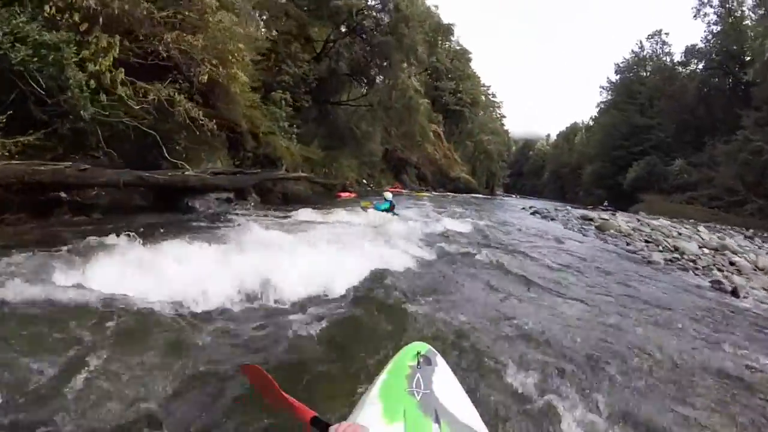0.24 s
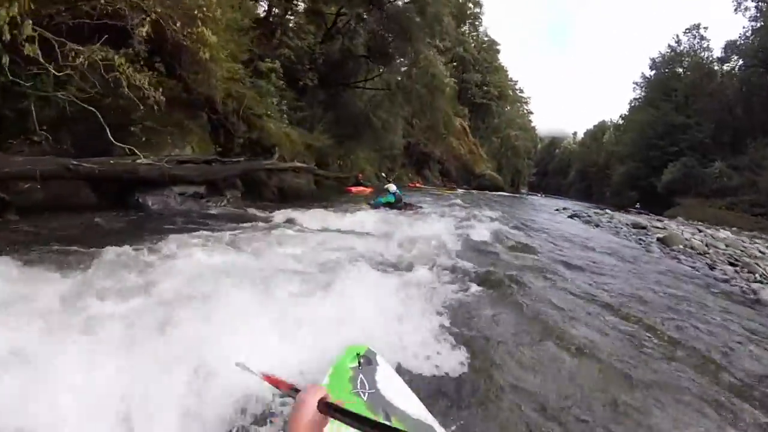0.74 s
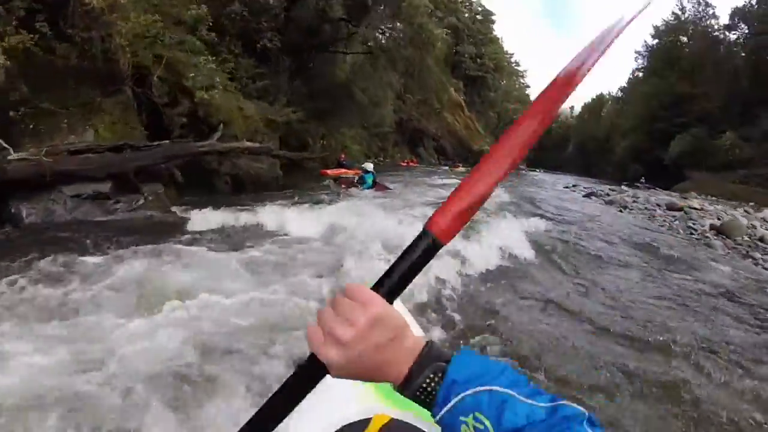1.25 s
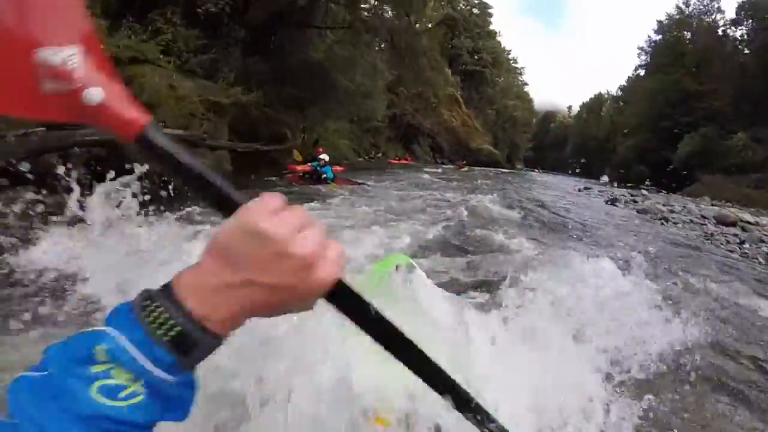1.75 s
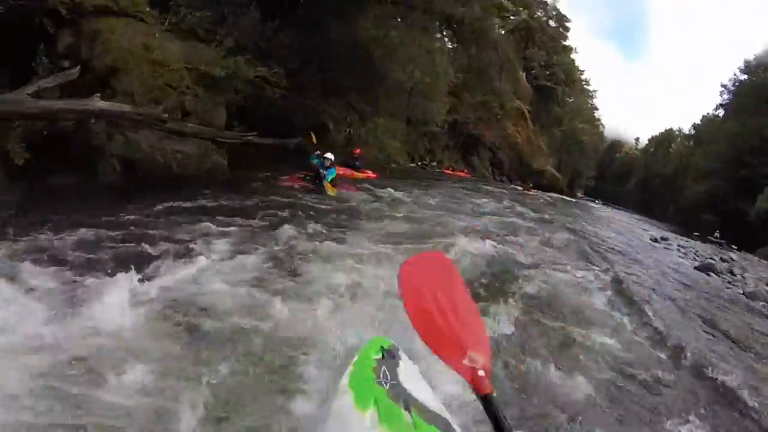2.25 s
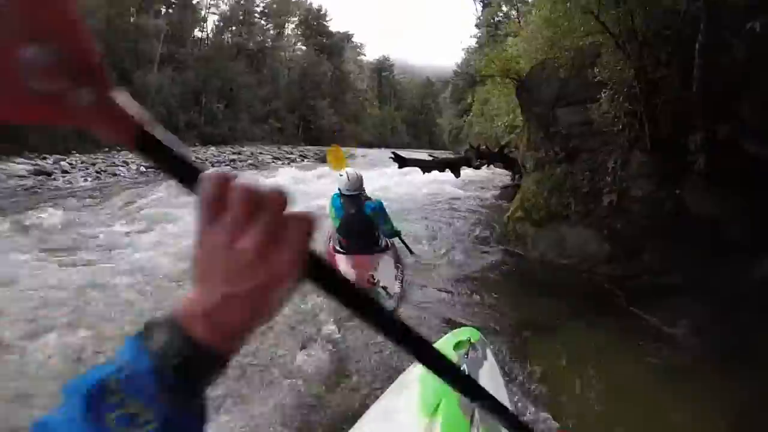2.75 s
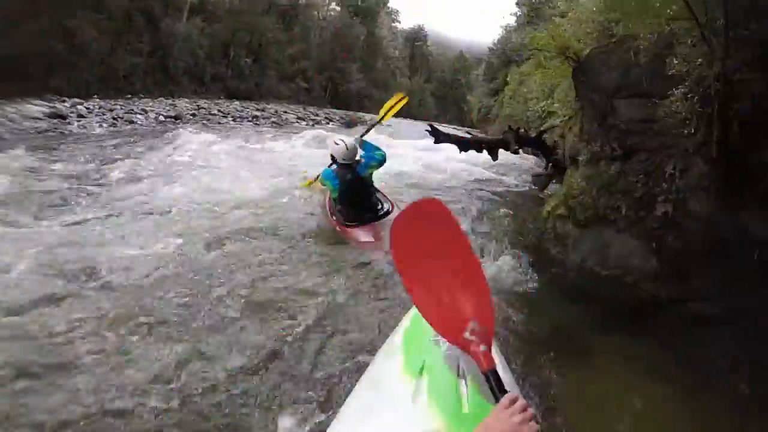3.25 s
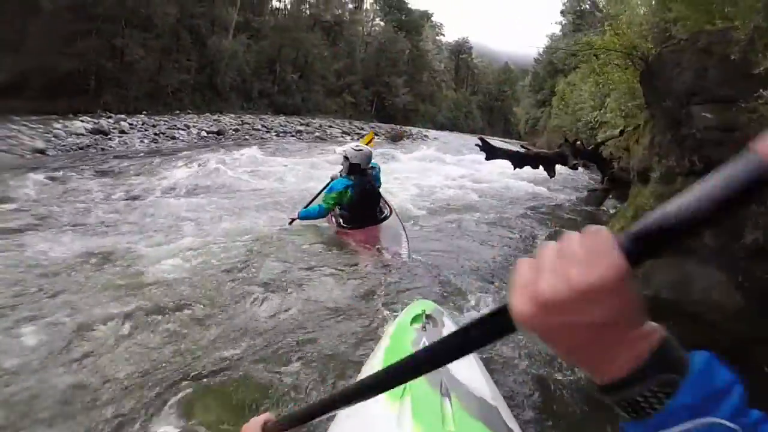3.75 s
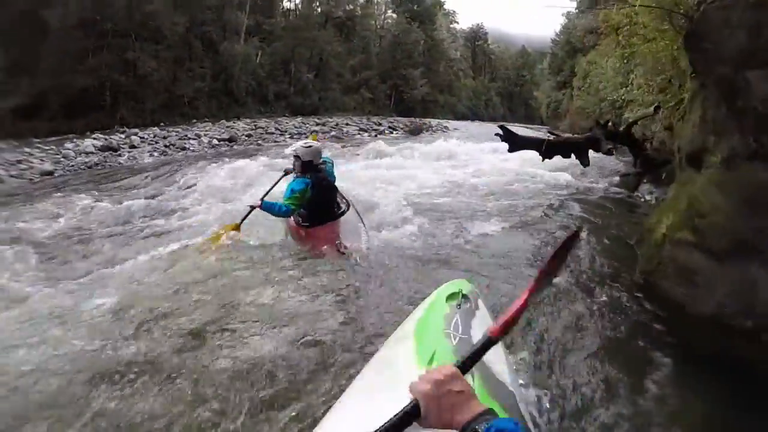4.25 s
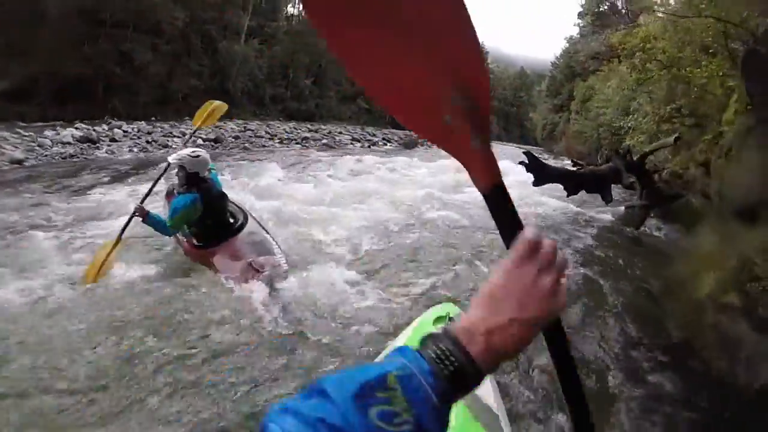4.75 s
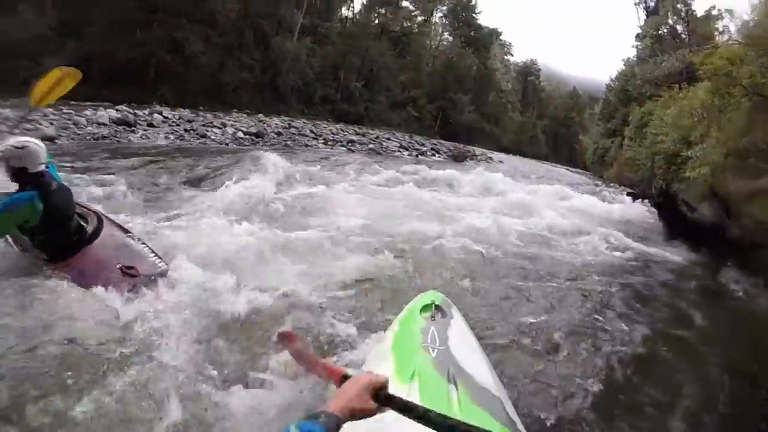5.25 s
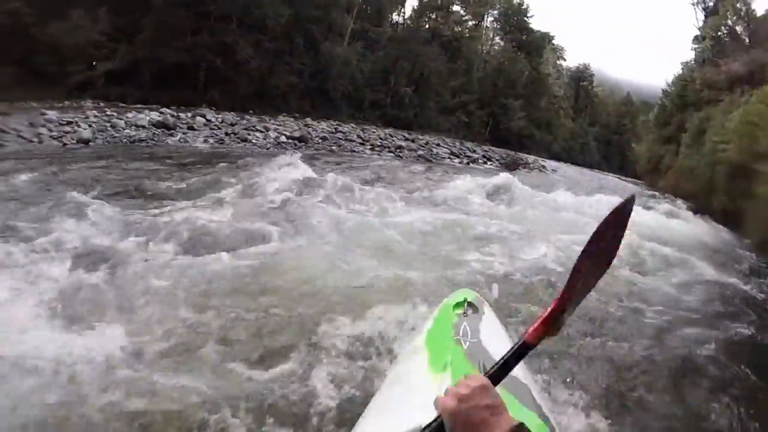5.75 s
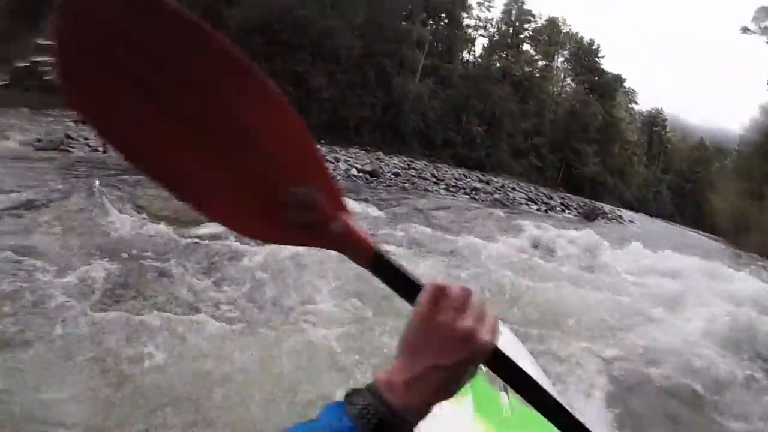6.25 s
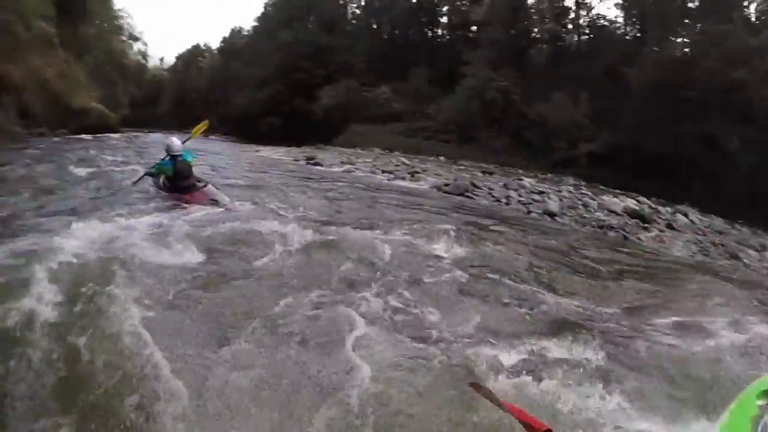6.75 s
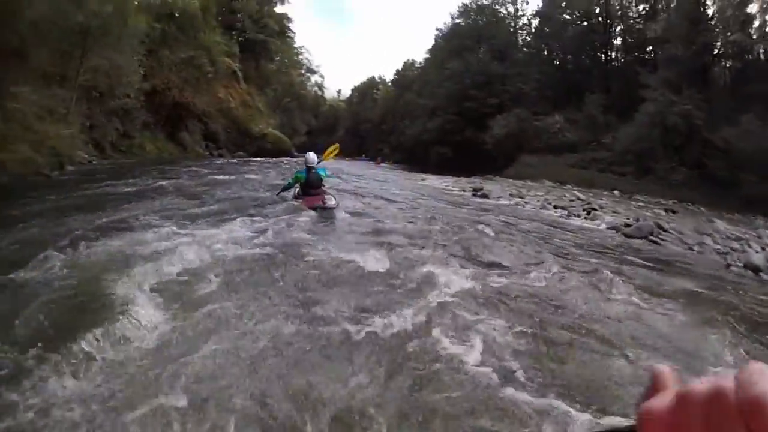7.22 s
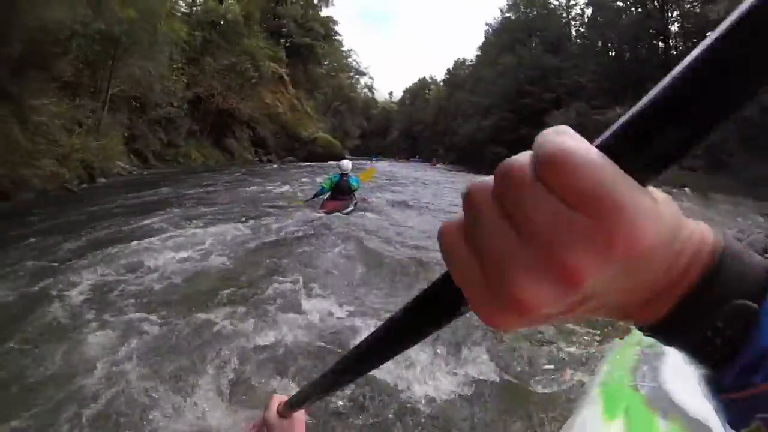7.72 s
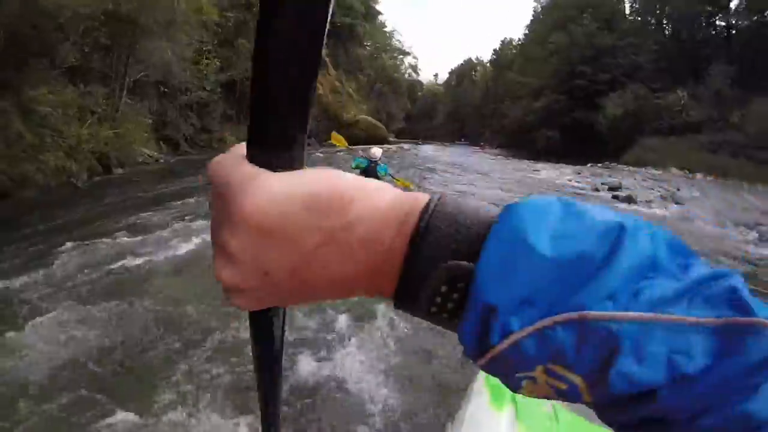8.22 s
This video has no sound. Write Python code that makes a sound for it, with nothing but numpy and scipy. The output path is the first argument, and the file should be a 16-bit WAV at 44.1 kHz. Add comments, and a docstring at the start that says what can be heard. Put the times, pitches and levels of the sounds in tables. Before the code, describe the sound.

A kayak runs a rapid, heard in mono by a microphone in a waterproof case on the paddler. Dense foamy roar swells through a breaking wave, with splashes, hollow hull booms and low air buffeting. Around 2.6 seconds it abruptly quietens; drops, plops and one paddle knock stand out. Stroke surges follow and the roar gradually returns.

```python
"""Foam roars as a kayak runs a whitewater rapid, heard in mono through a waterproof case worn by the paddler.
Foam, gurgle and spray are noise with ringing bubbles, shaped by the resonances of the case walls.
Splashes, drops, bubble plops and a paddle knock stand out; waves boom in the hull and air buffets the case.
The boat first punches through a breaking wave; at 2.6 s the water abruptly becomes quieter."""
import sys
import numpy as np
from scipy import signal
from scipy.fft import rfft, irfft, next_fast_len
from scipy.io import wavfile

SR = 44100
rng = np.random.default_rng(int(sys.argv[2]) if len(sys.argv) > 2 else 0)


def master(y):
    """Save y as 16-bit WAV."""
    cut = np.clip(np.atleast_2d(y).T, -1, 1)
    pcm = np.round(cut * 32767)  # scale
    wavfile.write(sys.argv[1], SR, pcm.astype(np.int16))


N = 373968
TIME = np.arange(N) / SR

# foam level in ordinary running water [dB]
CALM_DB = -41
# how hard the river churns, as its foam level before surges: (time [s], level [dB])
CHURN = [(0.0, -40), (0.2, -39), (0.45, -37), (0.75, -35.5), (2.57, -36.5), (2.605, -45.5), (3.25, -45.5),
         (3.87, -45.5), (4.22, -42.5), (4.62, -45.2), (5.27, -41), (5.8, -42.5), (6.23, -46), (6.62, -43),
         (6.9, -40.5), (7.25, -39.5), (7.7, -41.5), (8.48, -38)]


def churn():
    """Common excitation: one turbulence level, in dB above calm water, drives every river layer."""
    return in_time(CHURN)[0] - CALM_DB


# white water from a paddle stroke or a wave:
# (crest time [s], width at half height [s], added spray [dB], added foam [dB], added gurgle [dB])
SURGES = [(0.66, 0.65, 2.5, 1, 1.5), (1.02, 0.47, 1, 0.6, 3.5), (1.56, 0.16, 2.5, 2, 4),
          (1.904, 0.29, 4.5, .5, 3.5), (2.26, 0.29, 4, 0, 2), (3.035, 0.052, 4.5, 1.5, -0.5),
          (3.2, 0.18, 3.5, 1, 2), (3.53, 0.39, 2.5, 1, 2.5), (3.99, 0.084, 4.5, 1, 2),
          (4.28, 0.19, -1, 0, 2), (4.865, 0.19, 3, 0.8, 0), (5.133, 0.1, 0, 0, 2.5),
          (5.4, 0.17, 1.5, .5, -0.5), (5.798, 0.31, 4.5, 2, 1.5), (6.096, 0.14, 3.5, 1, 3.5),
          (6.385, 0.26, 5.5, 2, 0.5), (6.747, 0.13, 5, 3, 0.5), (7.358, 0.16, 0.5, 0.5, 1),
          (7.668, 0.13, 4.5, 1.3, -1), (7.84, 0.13, 4, 2.5, 2), (8.382, .25, -0.5, -0.1, 1.5)]


def surges():
    """Superposition: overlapping surges sum in decibels, separately for spray, foam and gurgle."""
    return sum(np.outer(more_db, hump(s, width)) for s, width, *more_db in SURGES)


# foam spectrum, before normalization: (frequency [Hz], relative level per Hz [dB])
FOAM_SPECTRUM = [(900, -46.5), (1150, -18.5), (1310, 0.5), (1700, 1.5), (1900, -3), (2550, -1.5),
                 (3000, -9.5), (3600, -9.5), (4500, -43)]
# small over large bubbles, an index scaled by each layer; fresh white water is coarse, the water behind it fine:
# (time [s], foam fineness [dB], fizz fineness [dB])
FINENESS = [(0.0, -1.5, -4), (0.5, -2, -3), (0.9, -3.5, -0.5), (1.3, 0, 2.5), (1.55, -0.5, -3.5),
            (2.5, 1, 3.5), (2.7, -2, -6.5), (2.98, -1, 6.5), (3.3, -0.5, -1), (4.85, -1, 0.5),
            (5.4, -1.5, -2.5), (5.9, -1.5, -3), (6.55, -1, -1.5), (6.77, 1, 1.5), (7.22, 0, 5),
            (7.55, 0.5, 0), (8.15, 0, -1), (8.48, 0.5, 3)]
SURGE_FINE_SHARE = 0.1   # foam fineness gained per dB of added spray


def foam(tumble, surge_db):
    """Bubble resonance: dense small bubbles, born in clumps as crests tumble, ring higher when smaller."""
    births_per_s = 2400 * from_db(1.5 * tumble)
    cloud = bubbles(births_per_s, 1220, 3460, cycles=9.5, spread_db=2.5, clump_s=.012, scatter=.2)
    roar = through_case(froth(cloud, grain_db=-11), FOAM_SPECTRUM)
    fine_db = in_time(FINENESS)[0] + SURGE_FINE_SHARE * surge_db
    # fineness tilts the balance from the low band to the high band
    roar = lift(roar, 1400, 470, -.6 * fine_db)
    roar = lift(roar, 2600, 1600, 1.4 * fine_db)
    return rms_one(roar * from_db(0.52 * drift(26)))


# level in calm water [dB], and dB gained per dB of churn
GURGLE_DB, GURGLE_FOLLOWS = -54.5, 0.68
# gurgle spectrum, before normalization: (frequency [Hz], relative level per Hz [dB])
GURGLE_SPECTRUM = [(40, -32), (75, -0.5), (140, -3.5), (310, 0), (420, -3), (620, -3.5), (900, -6.5),
                   (1200, -3.5), (2000, -17.5)]


def gurgle():
    """Low bubble resonance: big air pockets folded under the waves ring at low pitches."""
    pockets = bubbles(450, 153.0, 1150, cycles=15.7, spread_db=2.0, clump_s=.03, scatter=.4)
    murmur = through_case(froth(pockets, grain_db=-14.5), GURGLE_SPECTRUM)
    return rms_one(murmur * from_db(0.9 * drift(2.0)))


# level in calm water before surges and run-out [dB], and dB gained per dB of churn
SPRAY_DB, SPRAY_FOLLOWS = -47, 1.14
MIST_FOLLOWS = 0.15   # dB of top-treble lift per dB of churn
# past the last white water the spray thins out: start [s], fade [s], loss [dB]
RUNOUT_S, RUNOUT_FADE_S, RUNOUT_LOSS_DB = 6.9, 0.6, 1.5
# spray spectrum, before normalization: (frequency [Hz], relative level per Hz [dB])
SPRAY_SPECTRUM = [(2600, -22), (3300, -16), (4100, -2), (5700, -1), (6900, -8.5), (7350, -15),
                  (8700, -13.5), (9700, -16), (10500, -21), (11500, -20), (13200, -22), (15000, -29)]


def spray(tumble, spray_db, churn_db):
    """Grain density: fizz and droplets merge in heavy spray and tick one by one in light spray."""
    density = from_db(.5 * (spray_db - np.mean(spray_db)))
    fizz = bubbles(5000 * density, 3560, 14400, cycles=19.5, spread_db=5.5, clump_s=.025, scatter=.14)
    drops_per_s = 800 * density * from_db(4.0 * drift(30))
    # differencing each click brightens it
    ticks = rms_one(np.diff(patter(drops_per_s, spread_db=11.0), prepend=0))
    # the root undoes the power gained from denser grains
    grains = (fizz + from_db(-6) * ticks) / np.sqrt(density)
    hiss = through_case(froth(grains, grain_db=-7.0), SPRAY_SPECTRUM)
    fine_db = in_time(FINENESS)[1]
    # finer bubbles ring higher
    hiss = lift(hiss, 4730, 1230, -.7 * fine_db)
    hiss = lift(hiss, 5880, 600, 0.83 * fine_db)
    # wilder water throws more mist
    hiss = lift(hiss, 11800, 7000, MIST_FOLLOWS * churn_db)
    return rms_one(hiss * from_db(0.42 * tumble))


# splashes thrown up by paddle and bow:
# (onset time [s], level before filtering and layer gains [dB], twice the rise time [s])
SPLASHES = [(1.504, -42.5, 0.044), (1.863, -36.5, .05), (3.17, -47, .02), (3.275, -47, 0.023),
            (3.647, -47, .02), (3.938, -44, 0.025), (4.773, -48, .05), (5.793, -46, .03),
            (6.758, -41, 0.023), (7.262, -43, 0.018), (7.372, -39.5, 0.019), (7.648, -42, 0.026),
            (8.18, -47, 0.021)]


def splashes():
    """Breakup and entrainment: a water sheet falls back as droplets, which drive in small bubbles."""
    sheets = sum(swell(*row) for row in SPLASHES)
    droplets = sheets * rms_one(patter(6500, spread_db=3.0))
    plunge = lift(through_case(droplets, FOAM_SPECTRUM), 3100, 900, db=8.0)
    return from_db(-5) * through_case(droplets, SPRAY_SPECTRUM) + from_db(-6.5) * plunge


# single drops landing close by: (time [s], level before filtering and layer gain [dB])
DROPS = [(3.185, -34), (3.2789, -37.5), (3.543, -40), (3.902, -38.5), (3.9469, -41), (4.9277, -40),
         (5.0324, -41), (5.1177, -39), (5.3951, -38), (5.7099, -39), (5.7967, -45), (5.874, -42),
         (6.5535, -36), (6.8184, -37), (7.1566, -40), (7.2763, -39), (7.385, -41), (7.5796, -38),
         (8.1463, -38)]
# large bubbles bursting beside the boat: (onset time [s], level before layer gain [dB], pitch [Hz])
PLOPS = [(1.1345, -24, 2180), (2.8965, -30.5, 1700), (2.999, -38, 3100), (4.276, -41, 1520),
         (4.929, -29.5, 2260), (5.055, -28, 1580), (5.103, -28, 2350), (5.14, -31, 1530),
         (5.163, -31, 2350), (7.441, -29, 1690)]


def drops():
    """Impact and resonance: a close drop is a brief noise decay, a large bubble a short pitched plop."""
    decay = np.exp(-1 / (.0015 * SR))   # time constant 1.5 ms
    shatter = signal.lfilter([1], [1, -decay], strikes(DROPS) + 1e-18)
    ticks = through_case(shatter * rng.standard_normal(N), SPRAY_SPECTRUM)
    plops = 0
    for s, db, hz in PLOPS:
        plops = plops + swell(s, db, length=.0018) * np.sin(2 * np.pi * hz * (TIME - s))
    return from_db(0.5) * ticks + from_db(-1) * plops


# waves slapping the hull: (onset time [s], level before layer gain [dB], twice the rise time [s])
SLAPS = [(1.5, -52, 0.024), (1.916, -36, 0.027), (1.978, -39.5, 0.029), (2.025, -45, 0.03),
         (2.222, -42, 0.042), (2.328, -45, 0.024), (3.224, -51, 0.035), (5.308, -45, 0.053),
         (5.39, -48.5, .03), (5.57, -47, 0.018), (6.073, -44, 0.025)]
# upper modes of the hollow hull: (frequency [Hz], relative level [dB], 60 dB decay time [s])
HULL_MODES = [(140, 7, 0.054), (199, -2, 0.071), (283, -5, 0.077)]
HULL_BOOM_HZ = 77.2


def hull():
    """Cavity resonance: slaps boom in the hollow boat, their pitch wavering with the water loading the shell."""
    push = sum(swell(*row) for row in SLAPS)
    boom_hz = HULL_BOOM_HZ * from_db(1.0 * drift(24.5))
    boom = np.sin(2 * np.pi * np.cumsum(boom_hz) / SR)
    turbulence = rng.standard_normal(N)
    shell = rms_one(sum(from_db(db) * ring(turbulence, hz, t60) for hz, db, t60 in HULL_MODES))
    return from_db(2.0) * push * (boom + from_db(-11.0) * shell)


# the paddle knocks on the boat: (time [s], reference level for crack and shaft [dB])
KNOCKS = [(3.2452, -28.5)]
CRACK_DB, CRACK_S = -10.5, .003   # level against the knock [dB], twice the rise time [s]
# ringing of the paddle shaft: (frequency [Hz], level against the knock [dB], 60 dB decay time [s])
SHAFT_MODES = [(377, -22, 0.045), (620, -33, 0.035), (885, -18, 0.028), (1110, -17, 0.024),
               (1650, -13, .02), (2620, -10, .015)]


def paddle():
    """Impulse response: contact gives a dull crack and sets the shaft modes ringing."""
    contact = sum(swell(s, db + CRACK_DB, CRACK_S) for s, db in KNOCKS)
    dull_band = signal.butter(2, [500, 3000], "band", fs=SR, output="sos")
    crack = rms_one(signal.sosfilt(dull_band, rng.standard_normal(N)))
    shaft = sum(from_db(db) * ring(strikes(KNOCKS), hz, t60) for hz, db, t60 in SHAFT_MODES)
    return contact * crack + shaft


# buffeting spectrum, before normalization: (frequency [Hz], relative level per Hz [dB])
RUMBLE_SPECTRUM = [(10, -1.5), (22, -0.5), (33, -9), (50, -17.5), (80, -21.5), (140, -31), (400, -62)]
# the boat lurches and air buffets the case: (peak time [s], level [dB])
LURCHES = [(1.12, -38.5), (1.53, -40.5), (1.97, -39), (2.35, -42), (2.98, -47), (3.7, -54), (4.15, -46),
           (4.88, -47), (5.65, -42), (6.07, -47.5), (6.62, -46)]
LURCH_S, STILL_AIR_DB = 0.39, -52.5   # width at half amplitude [s], steady level [dB]


def buffet():
    """Turbulent pressure: lumpy sub-bass of air on the case; the powers of lurches and still air add."""
    power = from_db(STILL_AIR_DB) ** 2
    power = power + sum((from_db(db) * hump(s, LURCH_S)) ** 2 for s, db in LURCHES)
    return np.sqrt(power) * rms_one(through_case(rng.standard_normal(N), RUMBLE_SPECTRUM))


# resonances of the case walls: (frequency [Hz], width at half lift [Hz], lift [dB])
CASE_MODES = [(1566, 127, 6.5), (2090, 196, 4), (2375, 97, 2), (3430, 170, 2), (3890, 180, 4),
              (4357, 185, 6), (4950, 180, 3), (5450, 150, 2.3), (6370, 150, 2)]


def through_case(x, spectrum):
    """Minimum-phase filtering: a smooth spectrum plus wall resonances; white noise keeps its level."""
    size = next_fast_len(N + SR // 2)
    hz = np.maximum(np.fft.rfftfreq(size, 1 / SR), 1)
    points = np.array(spectrum)
    db = np.interp(np.log(hz), np.log(points[:, 0]), points[:, 1], right=-80)
    for centre, width, peak in CASE_MODES:
        db = db + peak / (1 + (2 * (hz - centre) / width) ** 2)
    cepstrum = irfft(np.log(rms_one(from_db(db))), size)
    # folding the cepstrum makes the filter causal: nothing rings early
    cepstrum[1:size // 2] *= 2
    cepstrum[size // 2 + 1:] = 0
    return irfft(rfft(x, size) * np.exp(rfft(cepstrum)), size)[:N]


def bubbles(per_s, low_hz, high_hz, cycles, spread_db, clump_s, scatter, count=24):
    """Bubble ringing: each decays 60 dB in some cycles; those from one air pocket are alike. Rms 1."""
    pocket = np.cumsum(rng.random(N) < 1 / (clump_s * SR))
    size = (rng.random(N)[pocket] + scatter * rng.standard_normal(N)) % 1
    births = patter(per_s, spread_db)
    dealt = (size * count).astype(int)
    pitches = np.geomspace(low_hz, high_hz, count)
    return rms_one(sum(hz * ring(births * (dealt == k), hz, cycles / hz) for k, hz in enumerate(pitches)))


def froth(grains, grain_db):
    """Central limit: countless far grains blur to a smooth hiss, on which near ones stand."""
    return rms_one(rng.standard_normal(N) + from_db(grain_db) * grains)


def patter(per_s, spread_db):
    """Poisson-like arrivals: random clicks of either sign, mostly small and a few large."""
    born = rng.random(N) < per_s / SR
    sizes = from_db(spread_db * np.minimum(rng.exponential(1, N), 4.5))
    return born * sizes * rng.choice([-1, 1], N)


def ring(clicks, hz, t60):
    """Damped resonance: a unit click sets ringing a decaying sine of initial height 1."""
    r = np.exp(-np.log(1000) / (t60 * SR))
    w = 2 * np.pi * min(hz, SR / 2 - 1) / SR
    return signal.lfilter([0, np.sin(w)], [1, -2 * r * np.cos(w), r * r], clicks + 1e-18)


def strikes(rows):
    """Impulsive excitation: one click for each (time [s], level [dB])."""
    out = np.zeros(N)
    for s, db in rows:
        out[int(s * SR)] += from_db(db)
    return out


def swell(s, db, length):
    """Transient envelope: a quick rise from s to a peak at db after length / 2, then a slower fall."""
    age = np.maximum(TIME - s, 0) / (length / 2)
    return from_db(db) * age * np.exp(1 - np.minimum(age, 50))


def hump(s, length):
    """Gaussian envelope: a rise and fall of height 1, length wide at half height."""
    return np.exp(-np.log(2) * np.minimum((2 * (TIME - s) / length) ** 2, 60))


def lift(x, hz, width_hz, db):
    """Resonant emphasis: raise or lower one band by a gain that may change with time."""
    band = signal.lfilter(*signal.iirpeak(hz, hz / width_hz, fs=SR), x)
    return x + (from_db(db) - 1) * band


def drift(rate):
    """Random modulation: noise low-passed by two poles at rate [Hz], with a spread of 1."""
    r = np.exp(-80 * np.pi * rate / SR)   # one step per 40 samples
    noise = rng.standard_normal(N // 40 + 2002)
    slow = signal.lfilter([1], [1, -2 * r, r * r], noise)[2000:]
    return np.interp(np.arange(N) / 40, np.arange(len(slow)), rms_one(slow))


def in_time(rows):
    """Linear interpolation: each column of a curve, at every sample."""
    s, *columns = np.transpose(rows)
    return [np.interp(TIME, s, c) for c in columns]


def rms_one(x):
    """Power normalization: scale to an rms of 1."""
    return x / np.sqrt(np.mean(x ** 2) + 1e-20)


def from_db(db):
    """Logarithmic level: decibels to amplitude gain."""
    return 10 ** (np.asarray(db) / 20)


def scene():
    """Superposition: churn drives foam, gurgle and spray, surges ride on it, and all reaches one microphone."""
    churn_db = churn()
    more_spray_db, more_foam_db, more_gurgle_db = surges()
    runout = np.clip((TIME - RUNOUT_S) / RUNOUT_FADE_S, 0, 1)
    foam_db = CALM_DB + churn_db + more_foam_db
    gurgle_db = GURGLE_DB + GURGLE_FOLLOWS * churn_db + more_gurgle_db
    spray_db = SPRAY_DB + SPRAY_FOLLOWS * churn_db + more_spray_db - RUNOUT_LOSS_DB * runout
    tumble = drift(12)   # collapsing crests swell foam and spray together
    river = from_db(foam_db) * foam(tumble, more_spray_db)
    river += from_db(gurgle_db) * gurgle()
    river += from_db(spray_db) * spray(tumble, spray_db, churn_db)
    mono = river + splashes() + drops() + hull() + paddle() + buffet()
    return np.array([mono, mono])


CUTOFF_HZ = 15250


def record(dry):
    """Band limiting: a steep elliptic low-pass cuts the top."""
    low_pass = signal.ellip(12, .1, 80, CUTOFF_HZ, fs=SR, output="sos")
    return signal.sosfilt(low_pass, dry)


dry = scene()
out = record(dry)
master(out)
```